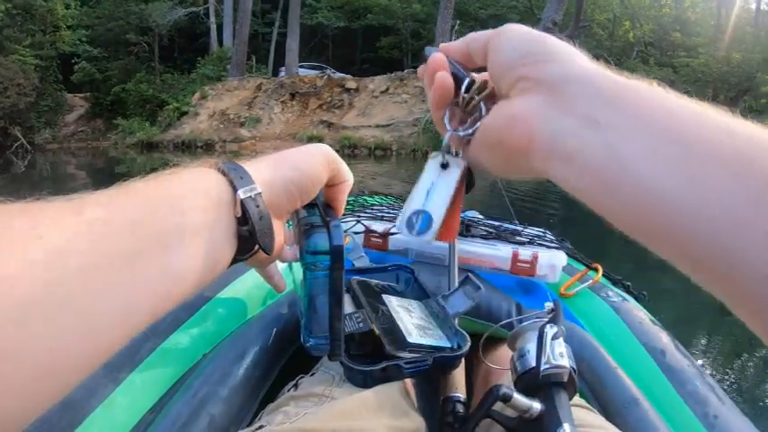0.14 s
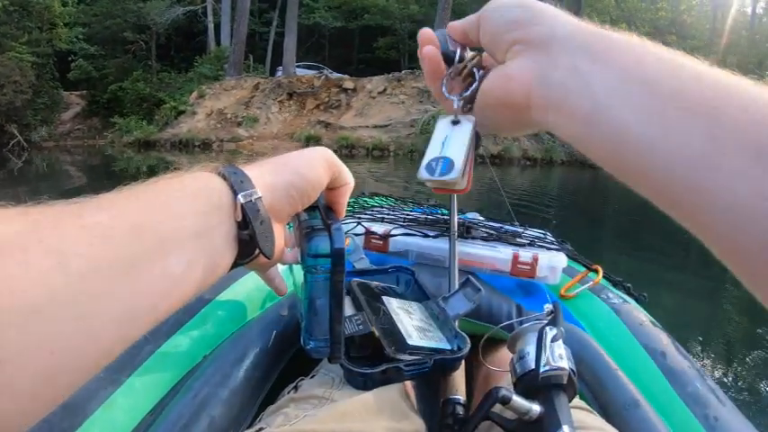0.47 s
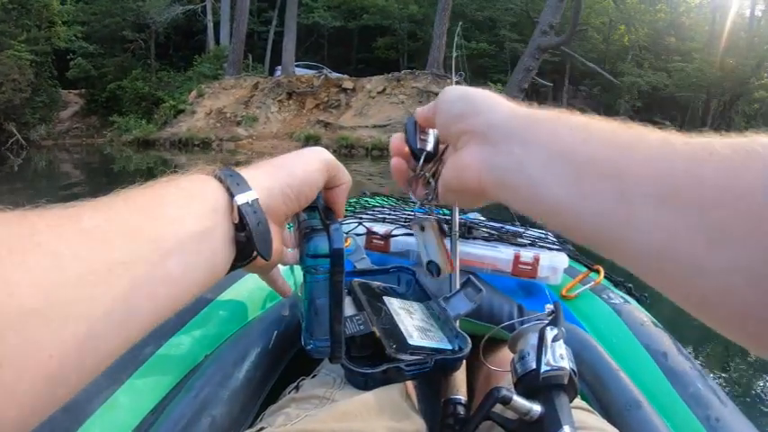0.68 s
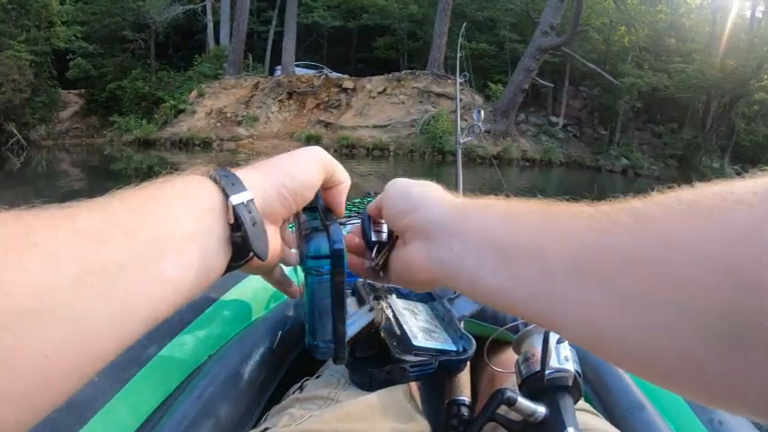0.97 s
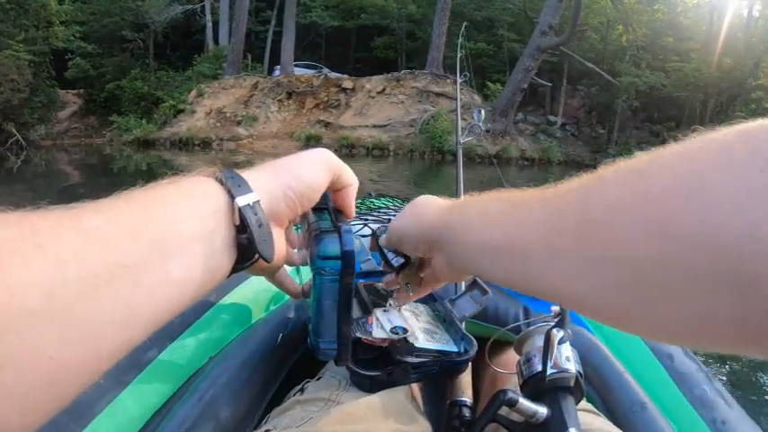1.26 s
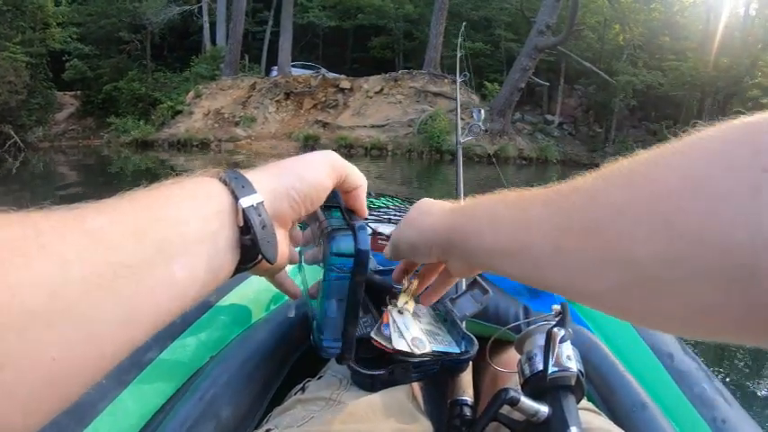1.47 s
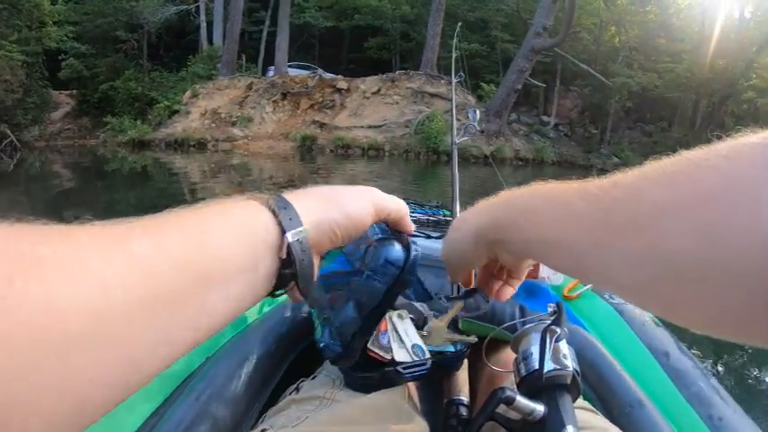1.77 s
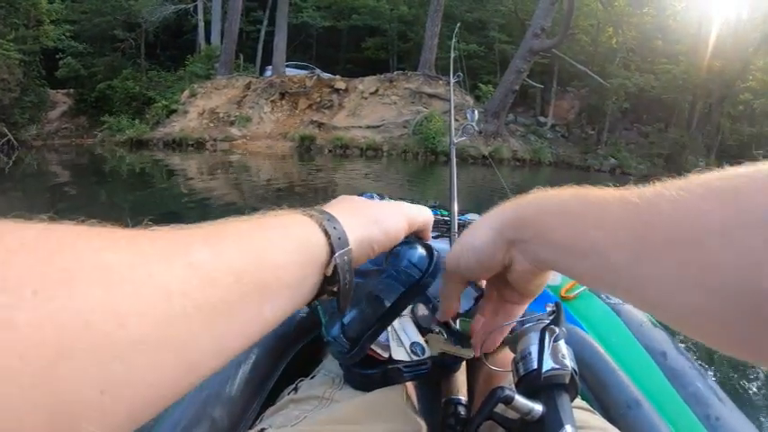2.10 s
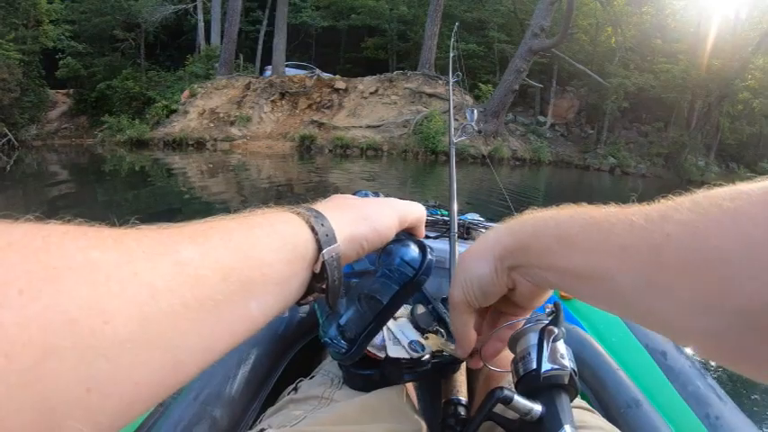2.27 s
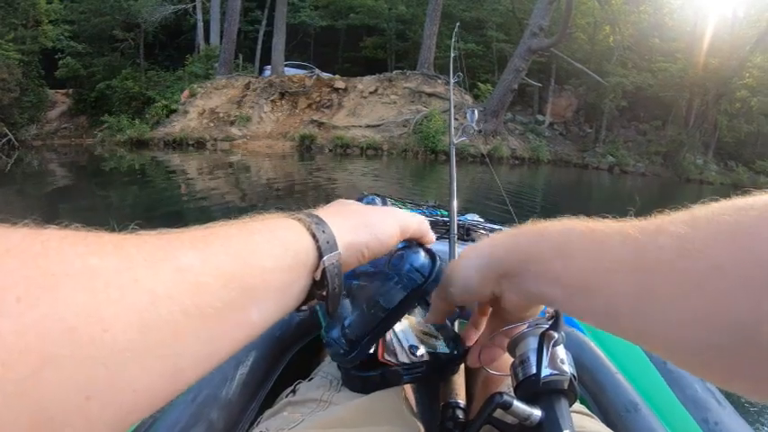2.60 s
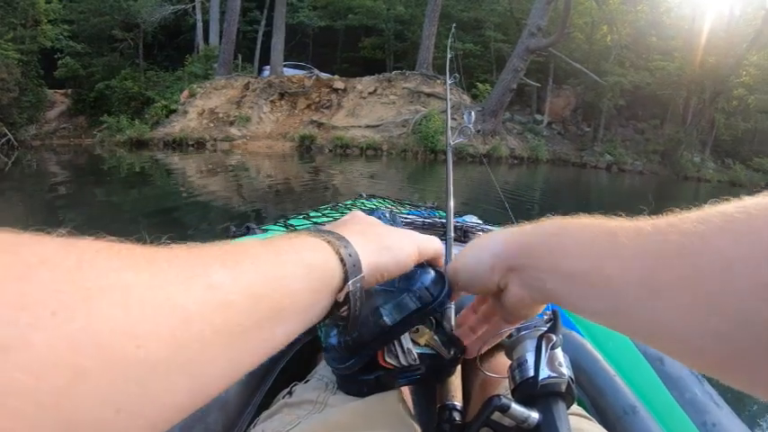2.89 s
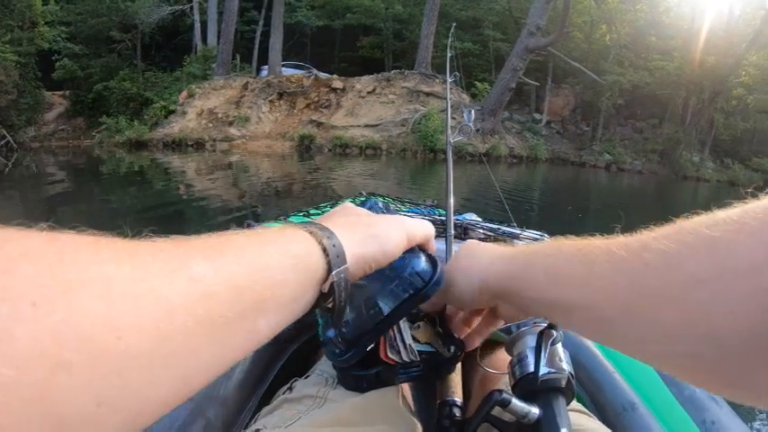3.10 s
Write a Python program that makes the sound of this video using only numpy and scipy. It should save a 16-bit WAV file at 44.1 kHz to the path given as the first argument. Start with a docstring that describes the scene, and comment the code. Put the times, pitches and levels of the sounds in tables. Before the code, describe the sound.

Close up outdoors on water, keys jingle and knock in a small hollow plastic case in irregular clusters, with brief steel ring chimes, dry shuffling, low wind puffs, a faint hum and hiss.

```python
"""On an inflatable boat, a bunch of keys is lowered into a small plastic box and pushed about to make it fit.
Each knock is a burst of tiny impacts that thuds in the hollow box, clacks on plastic and ticks on metal.
Between knocks the keys shuffle with light touches and friction, and two steel rings chime in thin modes.
Behind them: rumbling puffs of wind on the microphone, a low wavering hum, one short hollow tone (a gliding sine),
a hissy squeak (a narrow noise band) and faint outdoor hiss."""
import sys
import numpy as np
from scipy import signal
from scipy.fft import rfft, irfft
from scipy.io import wavfile

SR = 44100
rng = np.random.default_rng(int(sys.argv[2]) if len(sys.argv) > 2 else 0)


def store_pcm(level_fs):
    """Save levels as 16-bit WAV."""
    pcm = np.round(np.clip(level_fs, -1, 1) * 32767).astype(np.int16)
    wavfile.write(sys.argv[1], SR, np.atleast_2d(pcm).T)


N = 143325
TAU, SIDES = 2 * np.pi, np.array([[1], [-1]])   # one turn; sign of the left and right ear
PART_PAN_DB = [-4, -2, -1.0]   # left minus right for thud, clack, tick
CONTACT_S = 0.004   # chatter of a knock dies away; a ring's chime swells

KNOCK_WINDOW_S = .01   # the level of a knock holds over this first stretch
CONTACTS_PER_S, CONTACT_SPREAD_DB = 8000, 2.5   # tiny impacts within one knock
ATTACK_CYCLES = 0.41   # low parts swell later than high ones
FAVOUR_DB, FAVOUR_Q = 8.5, 3.3   # the spot that is hit brings out one resonance
# keys and tags knock on the box: [start_s, favoured_hz, thud_db, clack_db, tick_db]
KNOCKS = [(0.077, 2320, -52, -52, -43.5), (0.865, 1580, -39, -33, -49), (0.997, 1650, -33, -29.5, -27.5),
          (1.04, 600, -35, -29, -26.5), (1.049, 3320, -31, -24.5, -26), (1.115, 1820, -36, -28, -28),
          (1.396, 1680, -30, -23, -29), (1.417, 690, -27.5, -34.5, -28), (1.433, 530, -21, -30, -29.5),
          (1.445, 266, -26.5, -34, -29), (1.522, 400, -28, -40, -40.5), (1.589, 1450, -28, -16, -22),
          (1.615, 1640, -33.5, -22, -27), (1.623, 1550, -32.5, -25.5, -33), (1.689, 1600, -38.5, -30, -46),
          (1.833, 1450, -34, -29, -50), (1.887, 276, -21, -24, -30), (2.051, 3420, -43, -48.5, -56.5),
          (2.189, 1780, -37.5, -38.5, -40.5), (2.243, 1550, -34.5, -25.5, -25),
          (2.308, 1630, -39, -32.5, -40), (2.331, 1520, -31.5, -27.5, -24), (2.373, 595, -32, -29, -34),
          (2.39, 690, -26, -37, -37), (2.444, 590, -31, -28, -33.5), (2.458, 266, -30, -32.5, -50),
          (2.55, 312, -28, -23, -33), (2.595, 2020, -31.5, -28.5, -37), (2.726, 1900, -44, -25.5, -35),
          (2.744, 2000, -29, -20, -29.5), (2.781, 2070, -45.5, -31.5, -29.5),
          (2.979, 3430, -43.5, -31.5, -38), (2.995, 1920, -32.5, -34.5, -51), (3.027, 273, -29, -29, -40.5),
          (3.093, 1600, -39.5, -38.5, -44), (3.112, 664, -36.5, -31.5, -36.5),
          (3.128, 3340, -43, -36.5, -36)]


def knocks():
    """A few milliseconds of chatter favour one resonance: metal answers at once, the hollow box later."""
    out = silence()
    t = np.arange(SR // 7) / SR
    for start_s, favoured_hz, *levels_db in KNOCKS:
        for modes, level_db, pan_db in zip(contact_parts(), levels_db, PART_PAN_DB):
            lowest_hz = min(hz for hz, *_ in modes)
            swell = -np.expm1(-t * lowest_hz / ATTACK_CYCLES)
            shape = swell * np.exp(-t / CONTACT_S)
            force = shape * clicks(CONTACTS_PER_S, CONTACT_SPREAD_DB, size=len(t))
            force = force + from_db(FAVOUR_DB) * resonate(force, favoured_hz, FAVOUR_Q)
            sound = rms_one(body(force, modes), size=int(KNOCK_WINDOW_S * SR))
            add(out, start_s, from_db(level_db) * pan(pan_db) * sound)
    return out


RATTLES_PER_S, RATTLE_SPREAD_DB = 300, 3   # light touches
GRAIN_S, SLIDE_DB = .0012, -16.5   # time to the peak of one touch; steady sliding pressure
SHUFFLE_ATTACK_S, SHUFFLE_RELEASE_S = 0.0028, 0.017
# the bunch slides and rattles: [start_s, end_s, plastic_db, metal_db]
SHUFFLES = [(0.179, 0.309, -58, -52), (.45, 0.814, -60.5, -56), (.85, 0.904, -42, -44.5),
            (1.059, 1.242, -39.5, -40), (1.353, 1.42, -47.5, -44), (1.418, 1.472, -35, -32),
            (1.484, 1.597, -44, -45), (1.624, 1.645, -36, -35.5), (1.651, 1.892, -41.5, -48.5),
            (1.898, 1.922, -35.5, -41), (2.219, 2.282, -41, -43), (2.317, 2.479, -38, -42),
            (2.518, 2.626, -42.5, -53.5), (2.709, 2.765, -38, -46), (3.059, 3.147, -45.5, -50.5)]


def shuffles():
    """Many light, grazing touches over a little sliding friction; each touch favours other resonances."""
    out = silence()
    for start_s, end_s, plastic_db, metal_db in SHUFFLES:
        length_s = end_s - start_s
        t = np.arange(int((length_s + 0.11) * SR)) / SR
        release = np.exp(-np.maximum(t - length_s, 0) / SHUFFLE_RELEASE_S)
        shape = np.minimum(t / SHUFFLE_ATTACK_S, 1) * release
        grain = t / GRAIN_S * np.exp(-t / GRAIN_S)
        touches = np.abs(clicks(RATTLES_PER_S, RATTLE_SPREAD_DB, size=len(t)))
        levels_db = plastic_db, plastic_db, metal_db   # thud and clack share the plastic level
        for modes, level_db, pan_db in zip(contact_parts(), levels_db, PART_PAN_DB):
            sound = 0
            for some_modes in (modes[::2], modes[1::2]):
                uneven_touches = touches * rng.random(len(t))
                pressure = signal.fftconvolve(uneven_touches, grain)[:len(t)] + from_db(SLIDE_DB)
                friction = shape * pressure * rng.standard_normal(len(t))
                sound = sound + body(friction, some_modes)
            sound = rms_one(sound, size=int(length_s * SR))
            add(out, start_s, from_db(level_db) * pan(pan_db) * sound)
    return out


# thin partials of the single keys, weaker towards the top
KEY_RANGE_HZ, KEY_WIDTH_HZ, KEY_DB, KEY_FALL_DB_PER_OCT = (4270, 15790), 26.3, 5, 10
# resonances of the bunch of keys: [pitch_hz, width_hz, relative_level_db]
TICK = [(5115, 540, -1), (5870, 260, 5), (6470, 610, 2), (7460, 870, -6), (11100, 3400, -21)]


def key_modes(count):
    """The resonances of the bunch, plus thin partials of whichever keys happen to be touched."""
    low_hz, high_hz = KEY_RANGE_HZ
    partials = []
    for hz in rng.uniform(low_hz, high_hz, count):
        partials.append((hz, KEY_WIDTH_HZ, KEY_DB - KEY_FALL_DB_PER_OCT * np.log2(hz / low_hz)))
    return TICK + partials


# resonances of the hollow box: [pitch_hz, width_hz, relative_level_db]
THUD = [(276.4, 90, 1), (446.6, 92, -2.5), (588, 137, -7), (787, 139, -4)]
# resonances of the box walls and the tags: [pitch_hz, width_hz, relative_level_db]
CLACK = [(1176, 225, -5.5), (1513, 278, 0.5), (1835, 181, 0.5), (2710, 127, -2), (3412, 400, -1.5),
         (4370, 500, -11.5)]


def contact_parts():
    """Resonances of thud, clack and tick for one contact."""
    return THUD, CLACK, key_modes(count=14)


MODE_SPREAD_DB, DETUNE = 3.5, 0.0304   # random change of level and pitch (as a fraction) at each contact
SCATTER_DB, SCATTER_T60_S = -11, 0.096   # reflections in the boat
BODY_WIDTH = 0.43   # difference between the ears


def body(force, modes):
    """A force rings the resonances, a little differently each time and in each ear; the boat scatters it."""
    out = 0
    t = np.arange(len(force)) / SR
    for k, (hz, width_hz, level_db) in enumerate(modes):
        wave = resonate(force, hz * (1 + DETUNE * rng.normal()), hz / width_hz)
        # copies a few samples late, opposite in the two ears
        side = signal.lfilter([0, rng.normal(), 0, rng.normal()], [1], wave)
        strength = (-1) ** k * from_db(level_db + MODE_SPREAD_DB * rng.normal())
        out = out + strength * (wave + BODY_WIDTH * side * SIDES)
    echoes = rng.standard_normal(out.shape) * decay(t, SCATTER_T60_S)
    scatter = []
    for ear, echo in zip(out, echoes):
        scatter.append(signal.fftconvolve(ear, echo / np.linalg.norm(echo))[:len(t)])
    return out + from_db(SCATTER_DB) * np.array(scatter)


# the large ring is struck: [start_s, level_db]
LARGE_RING_HITS = [(1.158, -38.5), (1.208, -36), (1.419, -32.5), (1.449, -35), (1.468, -39), (1.528, -38.5),
                   (1.593, -26), (1.89, -38), (2.373, -30.5)]
# modes of the large ring: [pitch_hz, relative_level_db]
LARGE_RING = [(5706, -16), (5992, 2), (9916, -2), (11310, 0.5), (12688, -6.5), (15402, -5.5)]


def large_ring():
    """The large steel ring chimes in several modes at once."""
    return steel_ring(LARGE_RING_HITS, LARGE_RING, t60=0.13, spread_db=3.5)


# the small ring is struck: [start_s, level_db]
SMALL_RING_HITS = [(.625, -39), (.941, -35.5), (1.002, -29)]
# mode of the small ring: [pitch_hz, relative_level_db]
SMALL_RING = [(6422, 0)]


def small_ring():
    """The small steel ring chimes in a single mode."""
    return steel_ring(SMALL_RING_HITS, SMALL_RING, t60=0.11, spread_db=5.0)


RING_WINDOW_S = .02   # the level of a strike holds over this first stretch
RING_BLUR_HZ = 39.8   # widening of the ring's modes by jostling
RING_SCRAPE_DB, RING_SCRAPE_T60_S = -6.5, 0.053   # bright scrape, relative to the modes


def steel_ring(hits, modes, t60, spread_db):
    """A scrape, then thin modes chime, uneven at every strike; hanging keys jostle and damp them."""
    out = silence()
    t = np.arange(SR // 4) / SR
    for start_s, level_db in hits:
        scrape = rng.standard_normal((len(SIDES), len(t))) * decay(t, RING_SCRAPE_T60_S)
        chime = from_db(RING_SCRAPE_DB) * scrape
        for hz, mode_db in modes:
            jostle = np.cumsum(rng.standard_normal(len(t))) * np.sqrt(TAU * RING_BLUR_HZ / SR)
            phase = TAU * rng.random() + rng.standard_normal(SIDES.shape) + jostle
            strength = from_db(mode_db + spread_db * rng.standard_normal(SIDES.shape))
            shape = decay(t, t60) * -np.expm1(-t / CONTACT_S)
            chime = chime + strength * np.sin(TAU * hz * t + phase) * shape
        add(out, start_s, from_db(level_db) * rms_one(chime, size=int(RING_WINDOW_S * SR)))
    return out


CALM_DB, PUFF_HALF_S = -49, 0.057   # rumble between puffs; time from a puff's peak down to 1/e
WIND_PAN_DB = -8   # left minus right
# puffs of wind on the microphone: [peak_s, level_db]
PUFFS = [(0.148, -33), (0.77, -33.5), (1.12, -26), (1.259, -32), (2.119, -38.5)]
# colour of the wind rumble: [pitch_hz, relative_level_db]
WIND_SPECTRUM = [(30, -9), (130, -2.5), (240, -8), (700, -55.5)]


def wind():
    """Soft puffs of rumbling noise swell and pass, mostly on the right."""
    t = np.arange(N) / SR
    level = from_db(CALM_DB)
    for peak_s, puff_db in PUFFS:
        level = level + from_db(puff_db) * np.exp(-np.square((t - peak_s) / PUFF_HALF_S))
    return level * pan(WIND_PAN_DB) * noise(WIND_SPECTRUM, width=1)


HUM_HZ, HUM_PAN_DB, HUM_WAVER_DB = 59.9, -5, 3.5   # pan is left minus right
# level of the hum: [time_s, level_db]
HUM = [(.3, -40.5), (1.5, -47.5)]


def hum():
    """One low sine that wavers in level."""
    level_db, = in_time(HUM)
    level = from_db(level_db + HUM_WAVER_DB * waver(hz=4.8))
    return level * pan(HUM_PAN_DB) * sine(np.full(N, HUM_HZ))


# a short hollow tone: [time_s, pitch_hz, level_db]
TONE = [(.412, 403, -88), (.435, 422.6, -34), (.5, 438.4, -40), (.53, 398, -53.5), (1.2, 298, -78)]


def hollow_tone():
    """A brief sine of unsteady level that glides up, then sinks as it fades."""
    hz, level_db = in_time(TONE)
    return from_db(level_db + 2.8 * waver(hz=64)) * sine(hz)


SQUEAK_AT_S, SQUEAK_DB, SQUEAK_ATTACK_S, SQUEAK_T60_S = .435, -46.5, 0.027, 1.3
SQUEAK_HZ, SQUEAK_WIDTH_HZ, SQUEAK_SAG_HZ_PER_S = 3517, 190, 580


def squeak():
    """A narrow band of hiss, made by a sine times slow noise, swells, sinks in pitch and fades."""
    t = np.maximum(np.arange(N) / SR - SQUEAK_AT_S, 0)
    shape = -np.expm1(-t / SQUEAK_ATTACK_S) * decay(t, SQUEAK_T60_S)
    band = waver(SQUEAK_WIDTH_HZ) * sine(SQUEAK_HZ - SQUEAK_SAG_HZ_PER_S * t)
    return from_db(SQUEAK_DB) * shape * band


AIR_DB = -53
# colour of the outdoor hiss: [pitch_hz, relative_level_db]
AIR_SPECTRUM = [(300, 6.5), (1100, -5), (7000, -10), (9000, -20.5), (16000, -28)]


def outdoor_hiss():
    """Faint, steady, wide noise."""
    return from_db(AIR_DB) * noise(AIR_SPECTRUM, width=1.0)


def from_db(db):
    """Decibels to gain."""
    return 10 ** (np.asarray(db) / 20)


def rms_one(x, size=None):
    """Scale to rms 1 over the first samples, or over all."""
    return x / np.sqrt(np.mean(x[..., :size] ** 2) + 1e-20)


def in_time(rows):
    """Join the rows of a curve by straight lines."""
    times_s, *columns = np.transpose(rows)
    return [np.interp(np.arange(N) / SR, times_s, column) for column in columns]


def pan(db):
    """Left and right gains of constant power."""
    return rms_one(from_db(db * SIDES / 2))


def silence():
    """An empty stereo track."""
    return np.zeros((2, N))


def add(out, start_s, x):
    """Mix a sound in at a time."""
    i = int(start_s * SR)
    out[:, i:i + x.shape[1]] += x[:, :N - i]


def noise(spectrum, width):
    """Stereo noise of a given colour; rms 1."""
    hz, level_db = np.transpose(spectrum)
    bins_hz = np.fft.rfftfreq(N) * SR
    colour = from_db(np.interp(np.log1p(bins_hz), np.log1p(hz), level_db))
    mid, side = (irfft(rfft(rng.standard_normal(N)) * colour, N) for _ in SIDES)
    return rms_one(mid + width * side * SIDES)


def waver(hz):
    """Random motion, mostly up to a given rate; rms 1."""
    return noise([(hz, 0), (10 * hz, -90)], width=0.46)


def clicks(per_s, spread_db, size):
    """Random impacts of uneven strength and either sign."""
    strength = from_db(spread_db * np.minimum(rng.exponential(size=size), 4))
    return (rng.random(size) < per_s / SR) * strength * rng.choice([-1, 1], size)


def decay(t, t60):
    """A fall of 60 dB in the given time."""
    return from_db(-60 * t / t60)


def sine(hz):
    """A sine of rms 1 that follows a pitch curve."""
    return np.sqrt(2) * np.sin(TAU * np.cumsum(hz) / SR)


def resonate(x, hz, q):
    """One resonance with gain 1 on top."""
    return signal.lfilter(*signal.iirpeak(hz, q, fs=SR), x + 1e-18)


def scene():
    """Keys and box over the quiet background."""
    keys_and_box = knocks() + shuffles() + large_ring() + small_ring()
    background = wind() + hum() + hollow_tone() + squeak() + outdoor_hiss()
    return keys_and_box + background


OVERLOAD, CUTOFF_HZ = 1, 16100   # height that peaks are rounded towards; top of the treble


def record(dry):
    """Peaks are rounded, then a steep low-pass cuts the top."""
    rounded = OVERLOAD * np.tanh(dry / OVERLOAD)
    return signal.sosfilt(signal.ellip(10, .2, 80, CUTOFF_HZ, fs=SR, output="sos"), rounded)


dry = scene()
out = record(dry)
store_pcm(out)
```